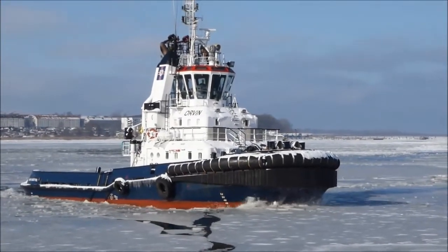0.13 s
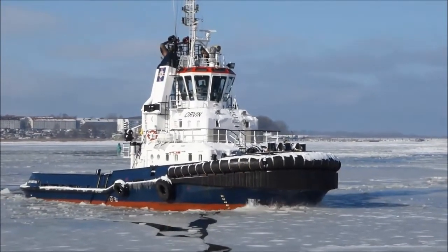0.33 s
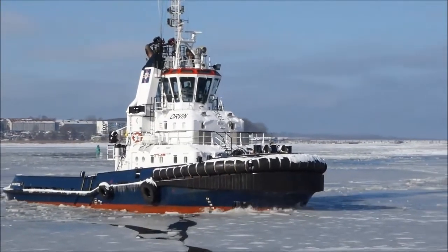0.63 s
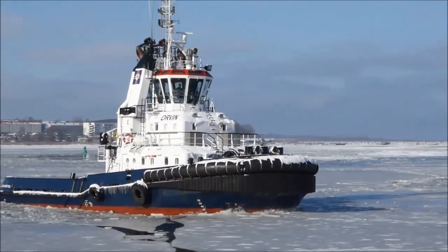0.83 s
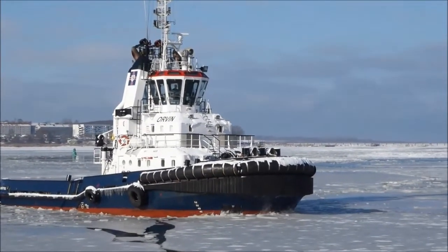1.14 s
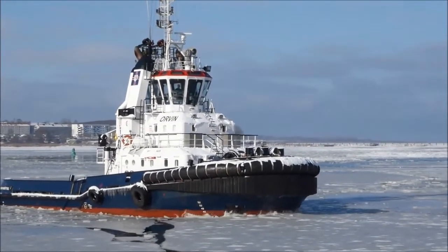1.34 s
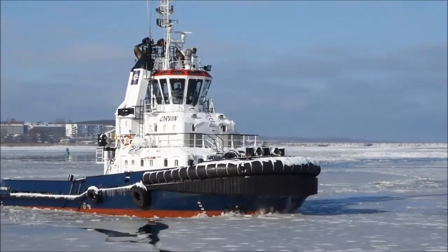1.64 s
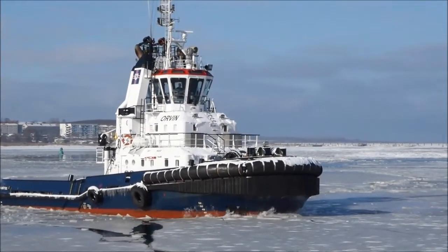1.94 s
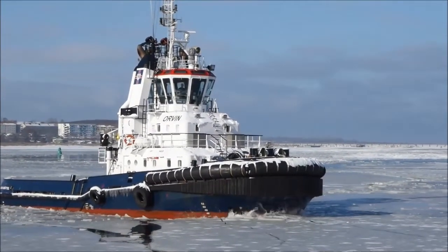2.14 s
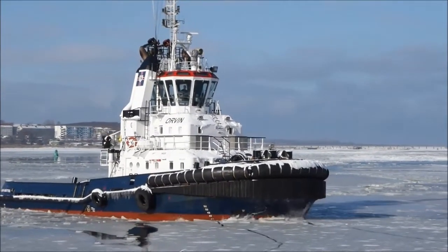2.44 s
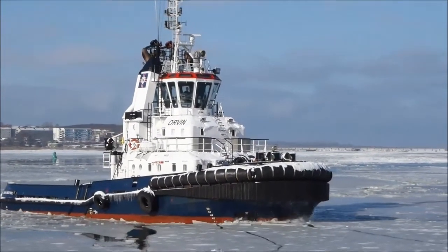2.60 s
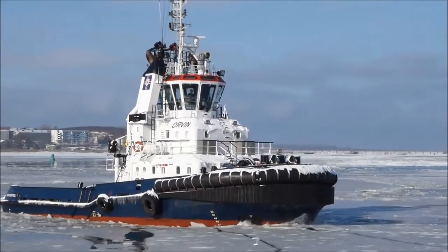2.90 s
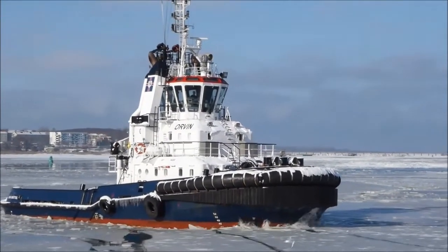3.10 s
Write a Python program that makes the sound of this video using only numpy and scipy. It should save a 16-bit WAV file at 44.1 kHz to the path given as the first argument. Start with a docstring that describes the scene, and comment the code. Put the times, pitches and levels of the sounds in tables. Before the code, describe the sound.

Deep tugboat engine rumble with a wavering drone, ice cracking and thudding on the hull, wind buffeting.

```python
"""Tugboat in thin harbour ice

A diesel throbs in filtered noise (rumble, boom, roar) under wavering sine tones, one of them dominant.
The bow crunches, splinters and fizzes through the sheet: grains and noise with patchy spectra.
Plates crack in short noise bursts; thick floes knock on the hull as decaying sines.
A rising wind buffets the two microphone ports as low noise."""
import sys
import numpy as np
from scipy import signal
from scipy.fft import rfft, irfft
from scipy.io import wavfile
from scipy.ndimage import uniform_filter1d

SR = 44100
rng = np.random.default_rng(int(sys.argv[2]) if len(sys.argv) > 2 else 0)


def output_pcm(signal):
    """Save a mono or channel-first signal as 16-bit PCM at the path in sys.argv[1].

    Samples are clipped to [-1, 1] before scaling.
    """
    pcm = np.clip(np.atleast_2d(signal).T, -1, 1) * 32767
    wavfile.write(sys.argv[1], SR, np.round(pcm).astype(np.int16))


N = 143766
T = np.arange(N) / SR  # s
HZ = np.fft.rfftfreq(N, 1 / SR)

# Spectrum of crushed ice. Each row: frequency in Hz, relative density in dB per Hz.
CRUNCH = [(400,-31),(1000,4),(1500,0),(1780,-2.5),(2050,.5),(2400,-2.5),(3000,-4.5),(3500,-9),(4100,-10),(4800,-18.5),(6200,-20.5),(8200,-27.5),(11000,-26),(14000,-65)]
# Spectrum of bright splintering of thin ice. Each row: frequency in Hz, relative density in dB per Hz.
SPLINTERS = [(1500,-11),(2800,-8),(3800,2.5),(4500,-2.5),(5500,-8),(7500,-22),(12000,-45)]


def amp(db):
    """Decibels to gain."""
    return 10 ** (np.asarray(db) / 20)


def unit(x):
    """Scales to rms 1."""
    return x / np.sqrt(np.mean(x ** 2) + 1e-20)


def over_hz(points):
    """Reads a table on a log-frequency axis."""
    hz, value = np.transpose(points)
    return np.interp(np.log(HZ + 1), np.log(hz + 1), value)


def level(points):
    """Gain over time from a dB curve."""
    return amp(np.interp(T, *np.transpose(points)))


def colour(x, spectrum):
    """Gives a signal a spectrum, at rms 1."""
    return unit(irfft(rfft(x) * amp(over_hz(spectrum)), N))


def noise():
    """Two unrelated white noises."""
    return rng.standard_normal((2, N))


def drift(rate_hz):
    """Random motion of rms 1, low-passed to half amplitude at rate_hz."""
    lowpass = (HZ > 0) / (1 + (HZ / rate_hz) ** 4)
    return unit(irfft(rfft(rng.standard_normal(N)) * lowpass, N))


def burst(start_s, rise_s, decay_s):
    """Quick rise and exponential fall."""
    age_s = np.maximum(T - start_s, 0)
    return np.minimum(age_s / rise_s, 1) * np.exp(-age_s / decay_s)


def grains(per_s, spread_db):
    """Sparse tiny fractures of random size, as single-sample impulses at rms 1."""
    size = amp(spread_db * np.minimum(rng.exponential(1, N), 4))
    struck = rng.random(N) < per_s / SR
    return unit(noise() * size * struck)


def patchy(pair, depth_db, width_hz, length_s):
    """Lets short stretches of neighbouring pitches swell and sink at random."""
    frame, hop = 512, 128
    z = signal.stft(pair, nperseg=frame, noverlap=frame - hop)[2]
    across = np.fft.fftfreq(z.shape[1], SR / frame)[:, None] * width_hz
    along = np.fft.fftfreq(z.shape[2], hop / SR) * length_s
    blur = np.exp(-2 * (across ** 2 + along ** 2))
    field = np.fft.ifft2(np.fft.fft2(rng.standard_normal(z.shape[1:])) * blur).real
    z = z * amp(depth_db * unit(field))
    return signal.istft(z, nperseg=frame, noverlap=frame - hop)[1][:, :N]


def steady(pair):
    """Partly evens out the chance surges of a noise, as a running engine does."""
    share, window_s = 0.35, 0.05
    power = uniform_filter1d(pair ** 2, int(window_s * SR), axis=1)
    power = uniform_filter1d(power, int(window_s * SR / 2), axis=1)
    return unit(pair / (abs(power) + 1e-9) ** (share / 2))


def engine():
    """Exhaust gas throbs through a deep rumble, a boom and a churning hollow roar."""
    # Beats in the exhaust. Each row: rate in Hz, depth 0-1 before scaling to rms 1.
    throbs = [(14.3, 0.05), (33.6, 0.06), (62.6, 0.14)]
    # Spectra. Each row: frequency in Hz, relative density in dB per Hz.
    rumble_spectrum = [(40,-66),(62,-28),(100,-11.5),(125,-4.5),(150,-0.5),(200,3.5),(240,3.5),(300,-8.5),(500,-30),(1200,-61)]
    boom_spectrum = [(100,-48),(200,-10),(250,-1),(285,-2.5),(320,-2),(400,-4),(450,-7),(500,-14.5),(620,-22),(1200,-86)]
    roar_spectrum = [(250, -90), (480, -12.5), (600, -1.5), (750, -1), (950, -5.5), (1100, -10),
                     (1300, -14.5), (1700, -23.5), (3000, -26.5), (6000, -73)]
    # Levels. Each row: time in s, level in dB before the trim.
    rumble_level = [(0,-19.5),(.2,-19.5),(.45,-23.5),(.65,-21.5),(.85,-22),(1.1,-24.5),(1.35,-24),(1.6,-20),(1.8,-22.5),(2.02,-19),(2.25,-22),(2.5,-23),(2.85,-25.5),(3.26,-25)]
    boom_level = [(0,-26),(.25,-23),(.42,-23),(.7,-27.5),(.85,-21.5),(1.05,-23),(1.25,-25),(1.45,-23.5),(1.7,-25.5),(1.92,-26),(2.15,-22),(2.4,-27),(2.75,-28.5),(3.26,-29)]
    roar_level = [(0,-29.5),(.15,-28.5),(.45,-28.5),(.7,-28),(.9,-30),(1.08,-29),(1.28,-30),(1.48,-29),(1.68,-30),(1.8,-28.5),(1.9,-28),(2,-29.5),(2.3,-31.5),(2.7,-33.5),(3.26,-34)]
    rumble_trim_db, boom_trim_db, roar_trim_db = -1.5, 1, 1.23

    throb = 1
    for hz, depth in throbs:
        throb = throb + depth * np.cos(2 * np.pi * (hz * T + rng.random()) + 0.4 * drift(0.77))
    throb = unit(throb)
    rumble = steady(colour(noise() * throb, rumble_spectrum))
    boom = steady(colour(noise() * throb, boom_spectrum))
    churn = patchy(noise(), depth_db=1.18, width_hz=137, length_s=0.03)
    roar = colour(churn * throb * amp(1.06 * drift(26)), roar_spectrum)
    return (rumble * level(rumble_level) * amp(rumble_trim_db)
            + boom * level(boom_level) * amp(boom_trim_db)
            + roar * level(roar_level) * amp(roar_trim_db))


def drone():
    """Engine tones that waver on their way over the water and swell as the boat moves."""
    # Each row: frequency in Hz, rms level in dB before waver and swell.
    tones = [(241, -26), (144.1, -41.5), (174.3, -41.5), (396.4, -42), (268, -33)]
    # Swell. Each row: time in s, gain in dB.
    swell = [(0,-13),(.5,4),(1,-3.5),(1.7,-1),(2.2,-3.5),(2.55,-4.5),(2.85,-2.5),(3.26,-7)]
    waver_hz, waver_db, skew_rad = 0.51, 3.3, 0.11  # rms; skew is the phase wander between the ports

    out = np.zeros((2, N))
    for hz, db in tones:
        turns = np.cumsum(hz + waver_hz * drift(4.3)) / SR + rng.random()
        skew = skew_rad * drift(11) * np.array([[.5], [-.5]])
        tone = np.sqrt(2) * np.sin(2 * np.pi * turns + skew)
        out += amp(db + waver_db * drift(17)) * tone
    return out * level(swell)


def ice():
    """Countless small fractures and splinters over the rush and fizz of the bow wave."""
    # Fizzing wash. Each row: frequency in Hz, relative density in dB per Hz.
    fizz_spectrum = [(2000, -9), (5000, 2), (7000, -1.5), (8300, -5.5), (9200, 0.5), (10600, 0),
                     (11500, -7), (12500, -19), (14500, -36)]
    # Levels. Each row: time in s, level in dB (fizz: before the trim).
    crunch_level = [(0,-42.5),(.13,-40),(.22,-43),(.3,-41),(.35,-44),(.43,-36.5),(.53,-41),(.68,-43),(.76,-38),(.9,-43),(1.08,-41),(1.3,-44),(1.38,-39.5),(1.43,-43),(1.71,-45.5),(1.79,-37),(1.93,-45),(2.03,-40),(2.28,-43),(2.45,-39.5),(2.72,-43.5),(2.87,-42),(2.97,-39),(3.03,-42.5),(3.26,-41.5)]
    splinter_level = [(0,-58),(.42,-50),(.7,-52.5),(1.7,-53.5),(1.8,-46),(1.95,-50.5),(2.14,-48.5),(2.27,-56),(2.45,-52),(2.7,-59),(2.95,-51.5),(3.26,-63)]
    fizz_level = [(0,-56),(.15,-56),(.3,-59.5),(.45,-56.5),(.8,-58),(1.2,-58.5),(1.68,-58.5),(1.85,-56.5),(2.05,-58.5),(2.28,-57.5),(2.38,-56),(2.75,-56.5),(2.92,-55),(3.05,-56.5),(3.12,-55.5),(3.26,-57)]
    grain_share, fizz_trim_db = 0.19, 3.5  # share of the crush power

    crush = np.sqrt(grain_share) * grains(per_s=900, spread_db=0) + np.sqrt(1 - grain_share) * noise()
    crush = patchy(crush * amp(0.61 * drift(44)), depth_db=1.5, width_hz=356, length_s=0.03)
    splinters = patchy(grains(per_s=1800, spread_db=1.5), depth_db=1.5, width_hz=940, length_s=0.033)
    fizz = patchy(noise(), depth_db=1.5, width_hz=700, length_s=0.035) * amp(0.5 * drift(26))
    return (colour(crush, CRUNCH) * level(crunch_level)
            + colour(splinters, SPLINTERS) * level(splinter_level)
            + colour(fizz, fizz_spectrum) * level(fizz_level) * amp(fizz_trim_db))


def cracks():
    """Plates of ice snap and thud against the hull, with no deep bass; thin ones splinter brightly."""
    # Each row: start in s, snap level in dB, snap decay in s, brightness 0-1, thud level in dB;
    # levels are before rise, decay and bass cut.
    breaks = [(.015,-37,.005,0,-27),(0.1148,-26,.009,0,-23),(.134,-29,.005,0,-24),(0.187,-29,.006,0.09,-16),(0.305,-30,.006,0,-28),(0.3655,-26,0.005,0,-18),(0.387,-29,0.006,0,-27),(0.41,-31,0.013,0,-17.5),(.507,-26,0.0057,0,-19),(.557,-31,0.0075,0.06,-15),(.627,-33,0.018,0,-14),(.753,-32,.012,0,-39),(.949,-33.5,0.004,0.8,-28),(1.163,-30,0.0064,0,-12.5),(1.367,-31.5,0.019,0.01,-17.5),(1.497,-36,.008,0.03,-16),(1.761,-29,0.0061,0,-16),(1.79,-40,.035,0.4,-19.5),(1.969,-36,0.011,0,-17),(2.323,-36,.005,0.4,-28),(2.355,-33.5,0.01,0.3,-19),(2.412,-35.5,.011,0.5,-24),(2.535,-36,0.0079,0.4,-18.5),(2.629,-36,0.0037,0,-28)]
    # Thud spectrum. Each row: frequency in Hz, relative density in dB per Hz.
    thud_spectrum = [(80,-54),(200,-5.5),(360,2.5),(500,-7.5),(750,0),(1050,-14.5),(1400,-31),(4000,-70)]
    snap_rise_s, thud_rise_s, thud_decay_s, bass_cut_hz = 0.001, 0.003, 0.017, 130

    snaps, splinters, thuds = np.zeros((3, N))
    for start_s, snap_db, decay_s, bright, thud_db in breaks:
        snap = amp(snap_db) * burst(start_s, snap_rise_s, decay_s)
        snaps += np.sqrt(1 - bright) * snap
        splinters += np.sqrt(bright) * snap
        thuds += amp(thud_db) * burst(start_s, thud_rise_s, thud_decay_s)
    blows = colour(noise(), CRUNCH) * snaps
    blows += colour(noise(), SPLINTERS) * splinters
    blows += colour(noise(), thud_spectrum) * thuds
    bass_cut = 1 - 1 / (1 + (HZ / bass_cut_hz) ** 4)
    return irfft(rfft(blows) * bass_cut, N)


def knocks():
    """Thick floes bump the bow, each ringing for a few cycles on its own hollow note."""
    # Each row: start in s, note in Hz, level in dB before rise, decay and low cut.
    floes = [(.317,390,-15.5),(.367,385,-5.5),(.419,407,-11.5),(.56,345,-9),(.634,246,-6.5),(0.791,283,-10),(.878,279,-12),(1.163,285,-8.5),(1.603,235.4,-8),(1.877,277,-9.5),(2.007,165,-5)]
    rise_s, decay_s = 0.0059, 0.013
    low_cut_hz = 112  # high-pass keeps the knocks free of sub-bass thump

    rings = np.zeros(N)
    for start_s, hz, db in floes:
        note = np.sin(2 * np.pi * hz * (T - start_s))
        rings += amp(db) * burst(start_s, rise_s, decay_s) * note
    return signal.sosfilt(signal.butter(4, low_cut_hz, "high", fs=SR, output="sos"), rings)


def wind():
    """Lumpy buffeting: unrelated noise at each port under a shared flutter, stronger later on."""
    # Each row: frequency in Hz, relative density in dB per Hz.
    wind_spectrum = [(20,-33),(45,-33),(70,-16.5),(100,-6.5),(150,4),(230,-0.5),(370,-3),(500,-8.5),(650,-13),(1000,-16),(2000,-50),(5000,-72)]
    # Strength at the ports. Each row: time in s, level in dB.
    gusts = [(0,-42),(.08,-31),(.2,-40),(.3,-27),(.42,-47),(.6,-61),(.8,-41),(1,-37),(1.17,-30),(1.32,-41),(1.52,-33),(1.78,-32.5),(1.9,-24.5),(2.1,-27),(2.4,-26.5),(2.85,-27.5),(3.02,-30),(3.18,-28),(3.26,-28.5)]
    flutter_db, flutter_hz = 2, 9

    buffeting = noise() * amp(flutter_db * drift(flutter_hz))
    return colour(buffeting, wind_spectrum) * level(gusts)


def ports(pair):
    """Spreads direct and scattered sound over two ports that resonate differently."""
    # Each row: frequency in Hz, likeness of the ports before tilt and lead (1 = same).
    likeness = [(40,.8),(80,.96),(120,.99),(400,.99),(510,.94),(700,.98),(1100,.88),(1550,.68),(1880,.58),(2400,.9),(3200,.88),(4500,.77),(7000,.65),(11000,.7)]
    # Each row: frequency in Hz, left minus right in dB.
    balance = [(140, -0.7), (500, -0.5), (680, -0.5), (900, 4.5), (1060, 6), (1250, -1), (1600, -8.5),
               (1720, 1.5), (1900, 9), (2300, 3), (2900, 1.5), (4000, 3.5), (5500, 1.5), (12000, 0.5)]
    # Each row: frequency in Hz, phase by which left leads in radians.
    lead = [(100,0),(500,-.05),(700,.1),(800,0),(880,-.3),(1000,-.9),(1140,-1.8),(1350,-3.2),(1550,-4.1),(1780,-4),(1960,-5.65),(2250,-5.9),(2900,-5.7),(4500,-6.3),(12000,-6.28)]

    direct, scattered = rfft(pair)
    same = over_hz(likeness)
    mid = direct * np.sqrt((1 + same) / 2)
    side = scattered * np.sqrt((1 - same) / 2)
    tilt = amp(over_hz(balance) / 2)
    left = (mid + side) * tilt * np.exp(1j * over_hz(lead))
    right = (mid - side) / tilt
    return irfft(np.array([left, right]), N)


def scene():
    """Engine and ice across the water, wind at the microphone."""
    return ports(engine() + ice() + cracks()) + drone() + knocks() + wind()


def record(dry):
    """The recorder's band limit."""
    edge_hz = 13200
    lowpass = signal.firwin(511, edge_hz, window=("kaiser", 9), fs=SR)
    return signal.oaconvolve(dry, lowpass[None], "same")


dry = scene()
out = record(dry)
output_pcm(out)
```